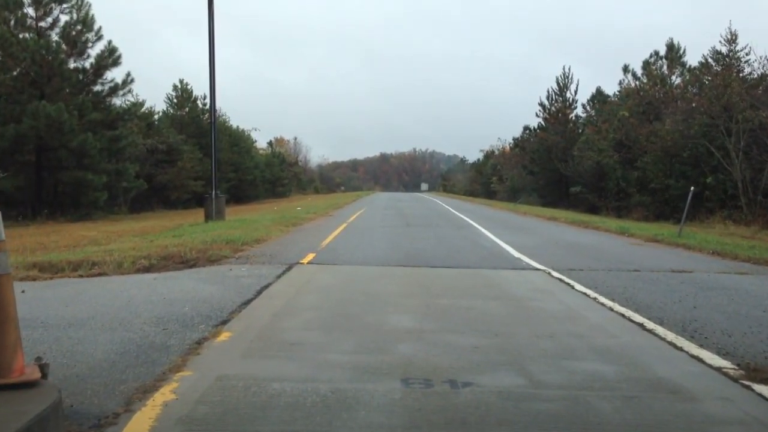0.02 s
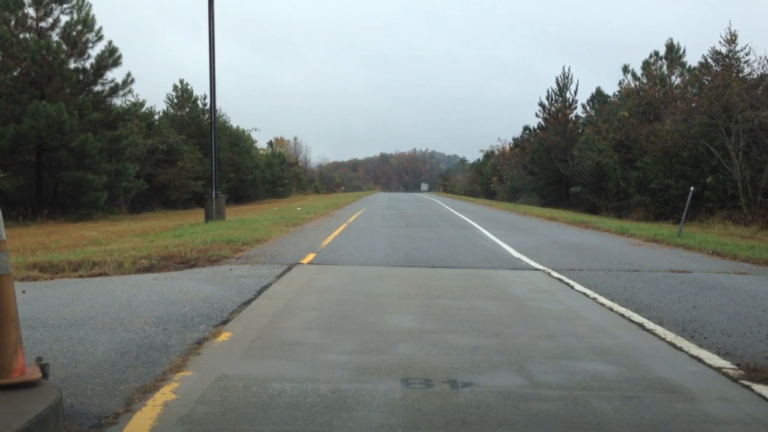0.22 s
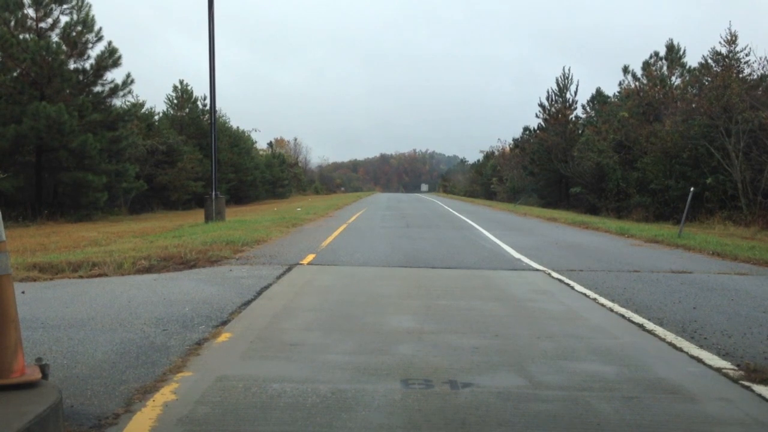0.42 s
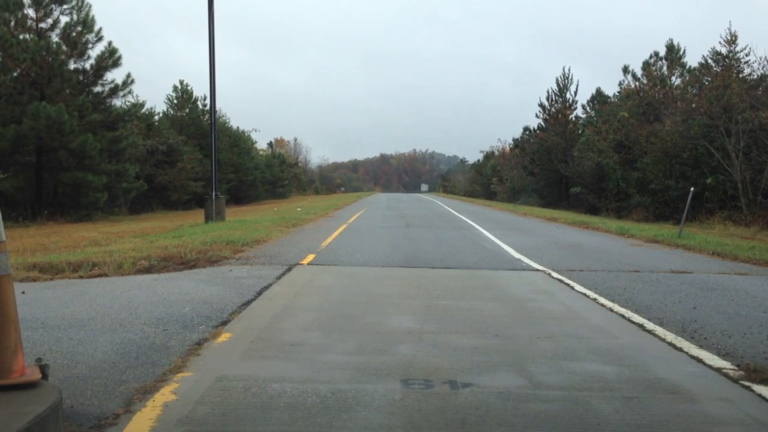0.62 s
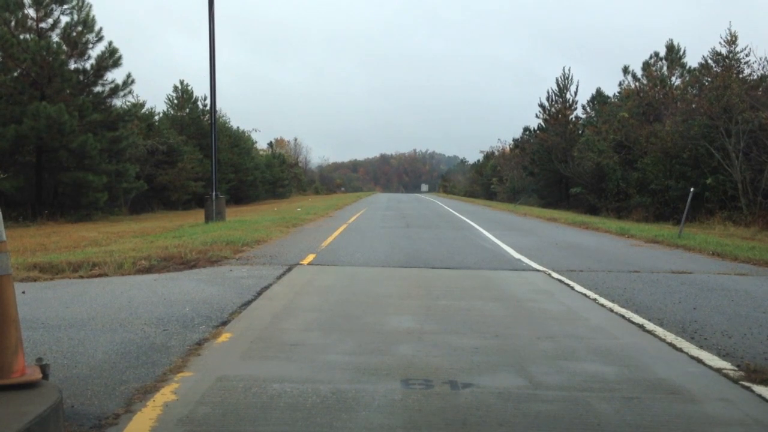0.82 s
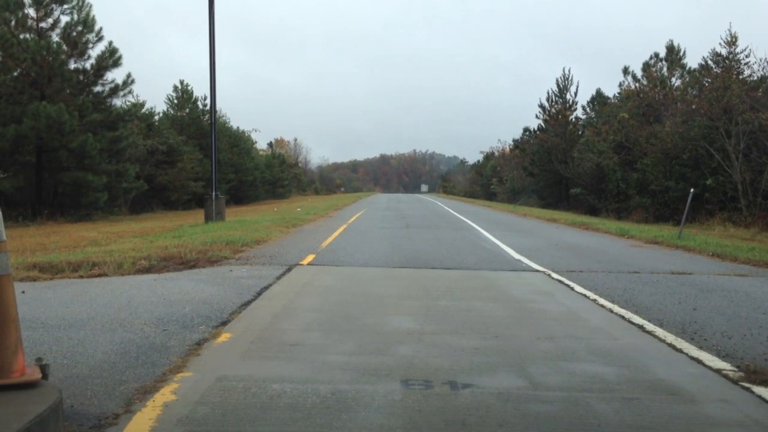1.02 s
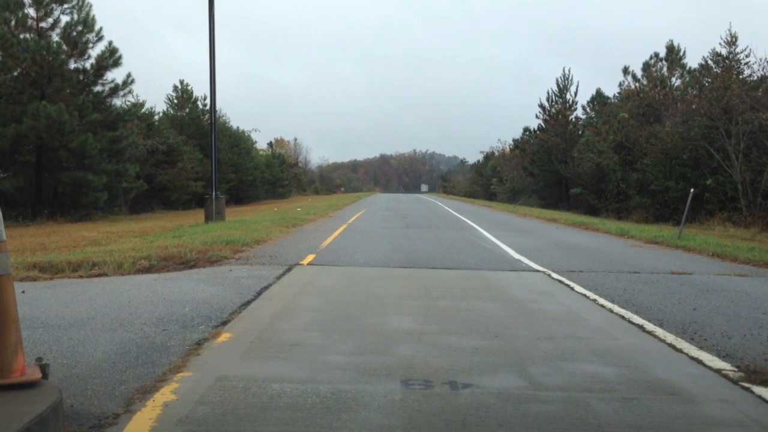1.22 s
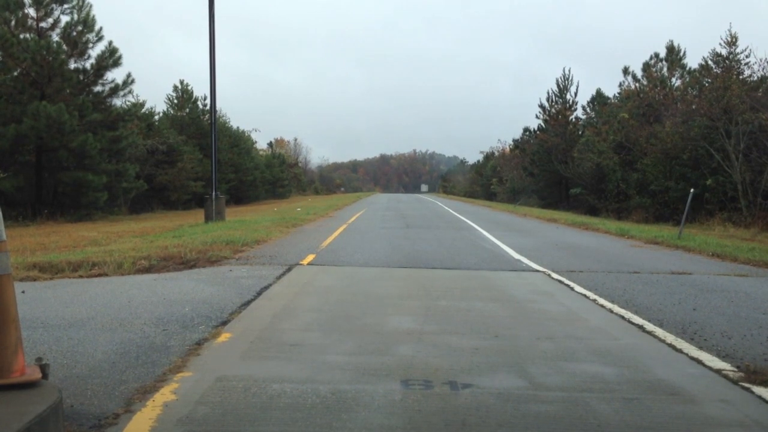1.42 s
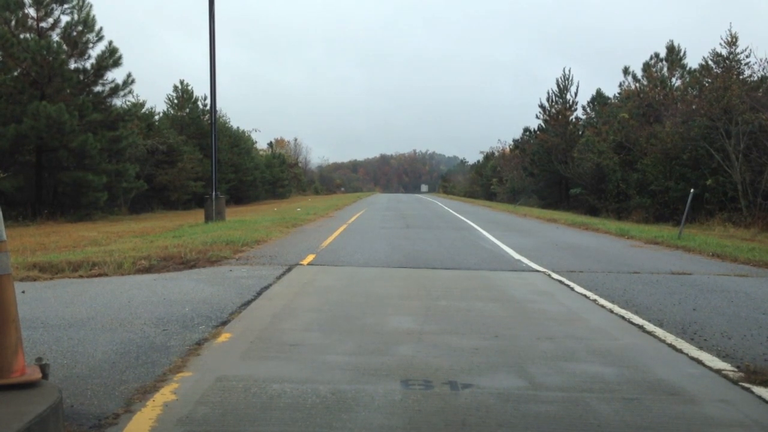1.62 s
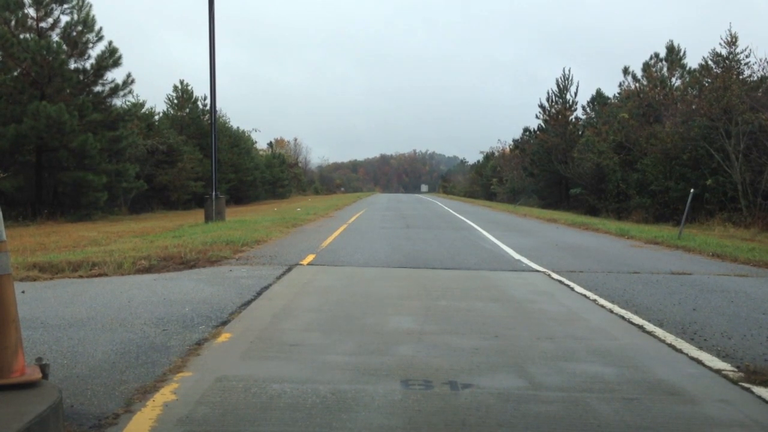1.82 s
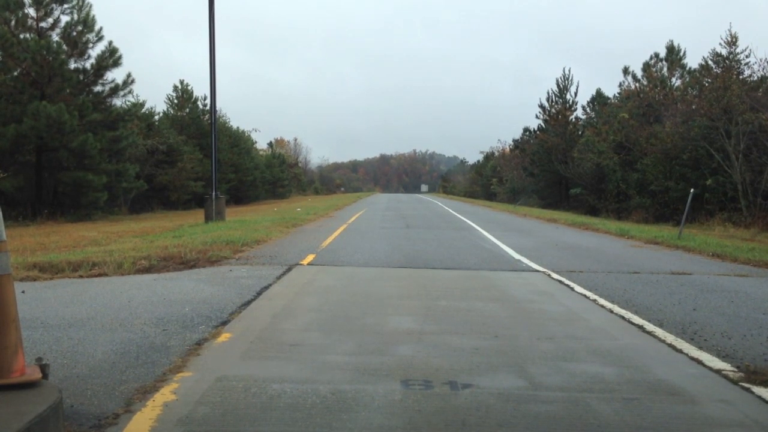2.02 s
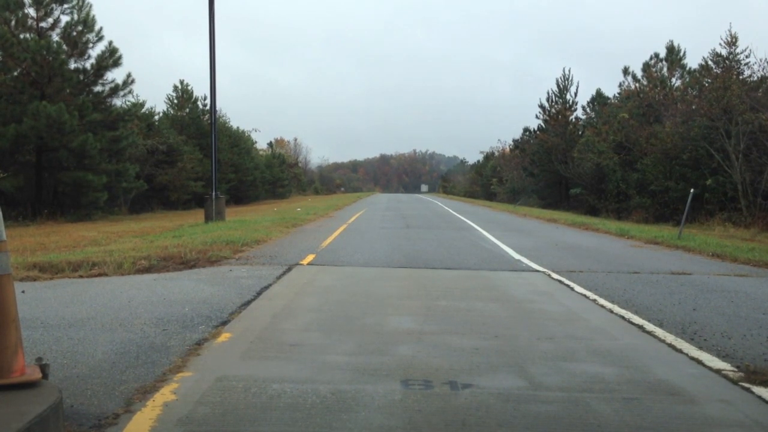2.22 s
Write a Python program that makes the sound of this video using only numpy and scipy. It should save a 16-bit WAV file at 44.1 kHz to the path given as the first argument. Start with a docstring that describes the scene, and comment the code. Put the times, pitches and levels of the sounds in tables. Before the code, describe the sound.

Coins clatter and skitter in a plastic toll basket after a hard knock in an idling car

```python
"""Coins tossed into a roadside coin machine clatter and roll in its plastic basket: ringing walls plus noise.
One skitters round the metal throat: a hail of tiny contacts makes the scrape, and damped tones the ringing.
Before that, coins click, and something in the car's cabin clunks dully and knocks shut: tones and noise bursts.
Behind it all the engine idles as throbbing low noise, with a soft hiss that swells and sinks."""
import sys
import numpy as np
from scipy import signal
from scipy.fft import rfft, irfft, next_fast_len
from scipy.io import wavfile

SR = 44100
rng = np.random.default_rng(int(sys.argv[2]) if len(sys.argv) > 2 else 0)


def unload_wav(signal):
    """Save mono or channel-first audio to the path in sys.argv[1] as 16-bit WAV at rate SR, clipped to [-1, 1]."""
    wavfile.write(
        sys.argv[1],
        SR,
        np.round(np.clip(np.atleast_2d(signal).T, -1, 1) * 32767).astype(np.int16),
    )


N = 101430  # length of the scene in samples
T = np.arange(SR // 2) / SR  # time axis of one short sound, in seconds

# In every table, t60/s is the time a sound takes to die away by 60 dB.
# tones of the plastic basket wall: [f/Hz, level/dB, t60/s]
BASKET_MODES = [(662, -8, .16), (765, -14, .08), (910, -6, .14), (1085, -9, .08), (1312, -1, .085),
                (1440, -9, .05), (1595, -5, .08), (1960, -10, .06), (2202, -11, .09), (2510, -11, .11)]
# bright snap of metal contact: [f/Hz, level per Hz/dB, t60/s]
METAL_SNAP = [(1500, -28, 0.016), (3200, -20, 0.019), (5240, 7, 0.022), (8100, -2, 0.068),
              (10160, 1.5, .035), (12100, -21, 0.044), (15600, 1.5, 0.035)]


def amp(db):
    """Turn decibels into a gain."""
    return 10 ** (np.asarray(db) / 20)


def unit(x):
    """Scale a sound to an rms strength of 1."""
    return x / np.sqrt(np.mean(x ** 2) + 1e-20)


def along(hz, points_hz, values):
    """Read values between table points, on a logarithmic frequency axis."""
    return np.interp(np.log(hz + 1), np.log(np.asarray(points_hz) + 1), values)


def colour(x, spectrum):
    """Filter a sound by the first two table columns, frequency and level."""
    hz = np.fft.rfftfreq(len(x), 1 / SR)
    points_hz, levels_db = np.transpose(spectrum)[:2]
    gain = amp(along(hz, points_hz, levels_db))
    return irfft(rfft(x) * gain, len(x))


def noise(spectrum, size):
    """Make coloured noise with an rms strength of 1."""
    return unit(colour(rng.standard_normal(size), spectrum))


def fade(t60):
    """Die away exponentially, by 60 dB in t60 seconds."""
    return np.exp(-np.log(1000) * T / t60)


def rise(seconds):
    """Start softly; the time is that of reaching about 63 percent."""
    return 1 - np.exp(-T / seconds)


def ring(modes, scatter_db, spread_s=0, pitch=1):
    """Add up dying tones, with optional random strengths and late arrivals."""
    out = np.zeros(len(T))
    for hz, db, t60 in modes:
        t = np.maximum(T - spread_s * rng.random(), 0)
        strength = amp(db + scatter_db * rng.standard_normal())
        out += strength * fade(t60) * np.sin(2 * np.pi * pitch * hz * t)
    return out


def burst(bands):
    """Stand in for countless weak tones: noise whose bands each die at their own speed."""
    centres, _, t60s = np.transpose(bands)
    hz = np.fft.rfftfreq(len(T), 1 / SR)
    spectrum = rfft(noise(bands, len(T)))
    out = np.zeros(len(T))
    for pick, t60 in zip(np.eye(len(bands)), t60s):
        # each pick is 1 at its own band and slopes to 0 at the neighbours
        band = irfft(spectrum * along(hz, centres, pick), len(T))
        out += band * fade(t60)
    return out


def hail(per_s, size):
    """Scatter tiny contacts at random times, with uneven strength and random sign."""
    happens = rng.random(size) < per_s / SR
    strength = amp(2.5 * rng.standard_normal(size))  # 2.5 dB of scatter
    return happens * strength * rng.choice([-1, 1], size)


def add(track, s, sound):
    """Mix a sound into the track at time s, in seconds."""
    start = max(round(s * SR), 0)
    part = track[start:][:len(sound)]
    part += sound[:len(part)]


def basket():
    """Each coin snaps on the wall, sets the basket clattering and rings briefly itself."""
    # coins striking the basket: [t/s, basket level/dB, snap level/dB, coin ring level/dB, coin pitch ratio]
    hits = [(1.6136, -43, -56, -70, 0.8), (1.6764, -51, -67, -75, 0.92), (1.6889, -44, -72.5, -79, 1.1),
            (1.8206, -39, -36, -49, 1.03), (1.8655, -49, -64, -60, 1.02), (1.9159, -30.5, -38, -47, 0.98),
            (1.928, -36, -37, -50, 0.92), (1.9508, -28, -35, -36.5, 1.1), (1.9595, -43, -41, -42, 1.05),
            (1.982, -41, -45, -54, 1.2), (2.0107, -37, -37, -37, 1.02), (2.0431, -40.5, -42.5, -51, 0.85),
            (2.104, -44, -44, -50, 0.94), (2.2791, -42, -39.5, -47, 0.83)]
    # loose rattle of the basket: [f/Hz, level per Hz/dB, t60/s]
    basket_rattle = [(200, -24, 0.045), (710, 2, 0.082), (1400, 3.5, 0.072), (2420, -8, 0.11),
                     (3100, -13, 0.087), (5600, -16, 0.17), (12000, -32.5, 0.24)]
    # tones of a small coin, before the pitch ratio: [f/Hz, level/dB, t60/s]
    coin_modes = [(8650, -6, .06), (9000, -4, .05), (9800, -10, .04), (14000, -10, .04), (14600, -12, .25),
                  (14750, -5, .05)]
    tones_db, rattle_db = -2, -2.5
    out = np.zeros(N)
    for s, basket_db, snap_db, coin_db, pitch in hits:
        tones = ring(BASKET_MODES, scatter_db=1.6, spread_s=0.000957)
        wall = amp(tones_db) * tones + amp(rattle_db) * burst(basket_rattle)
        clatter = amp(basket_db) * rise(0.00051) * wall
        snap = amp(snap_db) * burst(METAL_SNAP)
        coin = amp(coin_db) * ring(coin_modes, scatter_db=2, pitch=pitch)
        add(out, s, clatter + snap + coin)
    return out


def rolling():
    """Rolling rims bump along the plastic wall, each bump ringing it, and sizzle faintly."""
    # coins rolling down the basket between blows: [t/s, level/dB]
    roll_levels = [(1.6, -77), (1.7, -57), (1.8, -60.5), (1.97, -52), (2.08, -53), (2.2, -52), (2.3, -59)]
    bumps_per_s, sizzle_db = 500, -8.5
    bumps = hail(bumps_per_s, N)
    wall_ring = ring(BASKET_MODES, scatter_db=0) * fade(0.13)  # extra damping
    wall = unit(signal.fftconvolve(bumps, wall_ring)[:N])
    sizzle = amp(sizzle_db) * unit(colour(bumps, METAL_SNAP))
    # silent before the first table point
    level_db = np.interp(np.arange(N) / SR, *np.transpose(roll_levels), left=-np.inf)
    return amp(level_db) * (wall + sizzle)


def skitter():
    """A coin's rim chatters on metal: tiny contacts excite a scrape, with throat and coin ringing along."""
    # strokes of the coin: [t/s, scrape level/dB, rise/s, scrape t60/s, ring level/dB, scrape pitch ratio]
    strokes = [(2.115, -33.5, 0.0045, 0.14, -38, 1.02), (2.143, -38, 0.0018, 0.16, -70, 0.93),
               (2.164, -37, 0.0019, 0.098, -46, 1.18), (2.204, -44, 0.0031, 0.2, -68, 1.2),
               (2.264, -42, 0.011, 0.35, -63, 1.35)]
    # short, broad resonances of the rim, before the pitch ratio: [f/Hz, level/dB, t60/s]
    scrape_modes = [(1920, 2.5, 0.018), (3620, 4, 0.0088), (4270, -2.5, 0.0085), (5240, -1.5, 0.0063),
                    (6800, 4, 0.0037), (7940, -5, 0.0043), (13800, -2, .005)]
    # throat and coin ringing together: [f/Hz, level/dB, t60/s]
    throat_modes = [(1820, -6, .25), (1935, -5, .12), (2507, -10, .4), (3458, 0, .22), (3682, -4, .21),
                    (3955, -10, .3), (3992, -9, .3), (4378, -7, .45), (5190, -12, .17), (6681, -14, .22),
                    (7165, -14, .3), (7784, -17, .4), (8231, -15, .2), (8926, -15, .19), (10180, -19, .28),
                    (14690, -11, .45)]
    contacts_per_s = 2000
    out = np.zeros(N)
    for s, scrape_db, rise_s, t60, ring_db, pitch in strokes:
        contacts = hail(contacts_per_s, len(T))
        rim = ring(scrape_modes, scatter_db=0, pitch=pitch)
        rubbing = unit(signal.fftconvolve(contacts, rim)[:len(T)])
        scrape = amp(scrape_db) * fade(t60) * rubbing
        ringing = amp(ring_db) * ring(throat_modes, scatter_db=0.59, spread_s=0.001034)
        add(out, s, rise(rise_s) * (scrape + ringing))
    return out


def clicks():
    """Coins damped by the hand click as fading noise, with a ring from faint to as strong as the noise."""
    # coins clicking and rubbing as they are picked up: [t/s, level/dB, rise/s, t60/s, chink level/dB]
    coin_clicks = [(0.0664, -39, 0.00041, 0.034, -22), (0.1013, -42, 0.00056, 0.045, -28),
                   (0.461, -30, 0.0037, 0.048, -11), (0.5464, -42, 0.0033, 0.14, -1),
                   (0.827, -40, 0.018, 0.14, -20), (1.386, -57, .008, .09, -12),
                   (1.58, -56, .0005, 0.05, -17), (1.7935, -47, 0.00038, 0.023, -25)]
    # tone colour of a click: [f/Hz, level per Hz/dB]
    click_colour = [(200, -18), (1000, 7), (2200, 4), (3200, -11), (4500, -0.5), (5200, -6), (5850, 0),
                    (6600, -4), (8300, -6.5), (10000, -15), (15000, -18)]
    # ring of a held coin, damped further by each click's fade: [f/Hz, level/dB, t60/s]
    chink_modes = [(5730, -2, 0.35), (5800, 4, .2), (7350, -9, .2)]
    out = np.zeros(N)
    for s, db, rise_s, t60, chink_db in coin_clicks:
        rub = noise(click_colour, len(T))
        chink = amp(chink_db) * ring(chink_modes, scatter_db=1)
        add(out, s, amp(db) * rise(rise_s) * fade(t60) * (rub + chink))
    return out


def knock():
    """One hard blow cracks a panel, which rebounds softly and leaves the cabin air booming."""
    # tones of the knocked panel: [f/Hz, level/dB, t60/s]
    panel_modes = [(220, -3, 0.085), (288, -1.5, 0.047), (355, -2.5, 0.065), (598, -11, 0.1),
                   (842, -9, 0.038), (1006, -10, 0.03), (1266, -11.5, 0.047), (1570, -16, 0.053),
                   (1817, -13, 0.026), (2464, -23.5, 0.063)]
    # crack of the blow: [f/Hz, level per Hz/dB, t60/s]
    crack_bands = [(60, -32, 0.2), (297, 11, 0.13), (490, 3.5, 0.09), (730, -8, 0.11), (1470, 1, 0.036),
                   (2700, -13.5, 0.074), (3700, -22.5, 0.07), (6300, -9.5, 0.042), (9340, -18, 0.032),
                   (12100, -30, 0.036), (15000, -33, .04)]
    # boom of the cabin air: [f/Hz, level/dB, t60/s]
    boom_modes = [(133.6, -20.5, 0.304), (228.6, -27.5, 0.24), (276, -34, 0.29), (372, -32, 0.21),
                  (565, -32, 0.14)]
    knock_s, rebound_after_s, rebound_hz = 0.4685, 0.01854, 218
    out = np.zeros(N)
    panel = amp(-9) * rise(0.00056) * ring(panel_modes, scatter_db=0)
    crack = amp(-13) * rise(0.0026) * burst(crack_bands)
    boom = rise(0.015) * ring(boom_modes, scatter_db=0)
    add(out, knock_s, panel + crack + boom)
    # the panel's soft second bump
    rebound = amp(-10.5) * rise(0.0021) * fade(0.031) * np.sin(2 * np.pi * rebound_hz * T)
    add(out, knock_s + rebound_after_s, rebound)
    return out


def clunks():
    """Soft blows on cabin trim: a hollow ring with a loose rattle."""
    # dull clunks: [t/s, level/dB, rise/s, rattle level/dB, ring pitch ratio]
    blows = [(0.233, -26, 0.0043, -22, 0.63), (0.2416, -27, 0.0024, 4.5, 1.13),
             (0.2476, -22.5, 0.0025, -9.5, 1.05), (.257, -35, 0.0025, 8, 1.35),
             (.266, -28, 0.0019, -11, 0.65), (.277, -36, 0.0031, -1, 0.99),
             (0.2987, -26, 0.0011, -7, 1.013), (0.3053, -35, 0.0023, -0.5, 1.18),
             (0.333, -42.5, 0.0018, -18, .85), (.436, -40, 0.021, 11, 0.76),
             (.585, -36, 0.0089, 5.5, 0.884), (0.679, -49, 0.0078, 14, 1.8),
             (0.766, -35.5, 0.0033, -20, .7), (0.887, -41.5, 0.0041, -16, 0.74),
             (1.4, -39, 0.0066, 5, 0.82), (1.405, -30.5, 0.0058, -10, .75)]
    # tones of the trim, before the pitch ratio: [f/Hz, level/dB, t60/s]
    trim_modes = [(191, -8, 0.13), (281.4, 5.5, 0.074), (334, -2, 0.054), (664, -5, 0.076),
                  (751, -18, 0.089), (890, -17, 0.03), (1190, -20, 0.037), (1565, -17.5, .07),
                  (1850, -22, 0.071)]
    # loose rattle of the trim: [f/Hz, level per Hz/dB, t60/s]
    trim_rattle = [(150, -11, .06), (330, 1, 0.098), (470, -1.5, 0.15), (817, 11.5, 0.061),
                   (1400, -10.5, 0.078), (1980, -14.5, 0.12), (3300, -25, 0.11), (6640, -34, 0.24),
                   (14700, -52, 0.033)]
    out = np.zeros(N)
    for s, db, rise_s, rattle_db, pitch in blows:
        hollow = ring(trim_modes, scatter_db=2.5, pitch=pitch)
        rattle = amp(rattle_db) * burst(trim_rattle)
        add(out, s, amp(db) * rise(rise_s) * (hollow + rattle))
    return out


def background():
    """Engine rumble throbs with the firings, over a soft noise hiss that swells and sinks."""
    # tone colour of the idling engine heard in the cabin: [f/Hz, level per Hz/dB]
    idle_colour = [(25, 0), (50, -2), (80, 1), (140, -3), (195, 0.5), (250, -6.5), (370, -4.5),
                   (450, -15.5), (560, -12.5), (760, -15.5), (1300, -18.5), (2400, -34.5), (3200, -37.5),
                   (8000, -50)]
    # swelling of the hiss, before its overall lift: [t/s, level/dB]
    hiss_levels = [(0.0, -61.5), (0.502, -60.5), (0.652, -56), (0.778, -54.5), (1.296, -58), (1.408, -58.5),
                   (1.656, -69.5), (1.75, -62.5)]
    # tone colour of the hiss: [f/Hz, level per Hz/dB]
    hiss_colour = [(300, 14), (900, 4), (2400, 1.5), (3200, -8.5), (4500, -3.5), (6300, 0.5), (8300, -6),
                   (10500, -16), (15000, -16)]
    idle_db, firing_hz, throb_depth, hiss_lift_db = -45.5, 22.66, 0.15, 3.5
    t = np.arange(N) / SR
    throb = 1 + throb_depth * np.sin(2 * np.pi * firing_hz * t)
    idle = amp(idle_db) * unit(noise(idle_colour, N) * throb)
    hiss_db = hiss_lift_db + np.interp(t, *np.transpose(hiss_levels))
    return idle + amp(hiss_db) * noise(hiss_colour, N)


def scene():
    """Mix everything as heard from the driver's seat, in one channel."""
    coins = basket() + rolling() + skitter() + clicks()
    cabin = knock() + clunks()
    return (coins + cabin + background())[None]


def record(dry):
    """The microphone sheds the deep bass and cuts off steeply above its band limit."""
    low_cut_hz, top_hz = 128, 15400
    low_cut = signal.butter(N=3, Wn=low_cut_hz, btype="highpass", fs=SR, output="sos")
    thin = signal.sosfilt(low_cut, dry)
    size = next_fast_len(N + SR // 2)  # spare room so the filter does not wrap round
    hz = np.fft.rfftfreq(size, 1 / SR)
    limited = rfft(thin, size) / (1 + (hz / top_hz) ** 160)
    return irfft(limited, size)[:, :N]


dry = scene()
out = record(dry)
unload_wav(out)
```